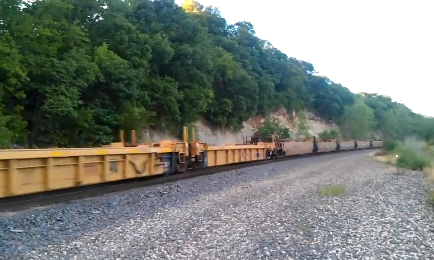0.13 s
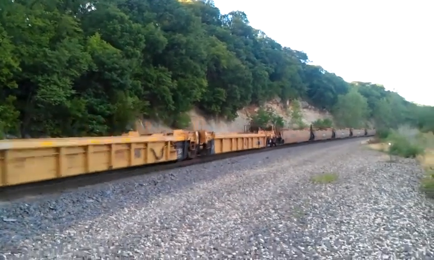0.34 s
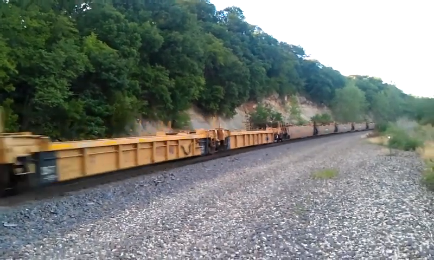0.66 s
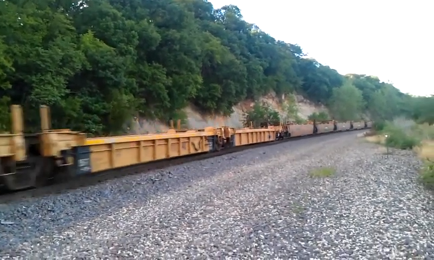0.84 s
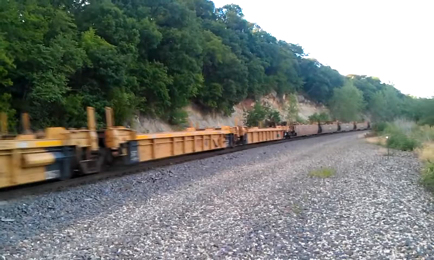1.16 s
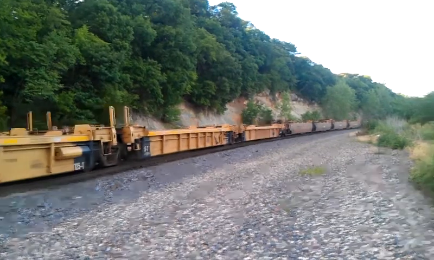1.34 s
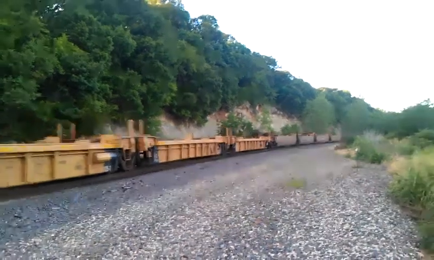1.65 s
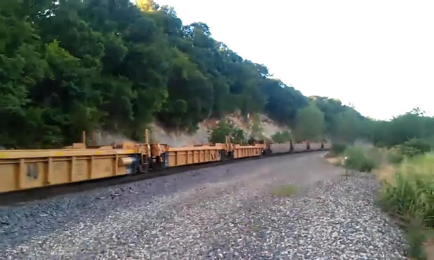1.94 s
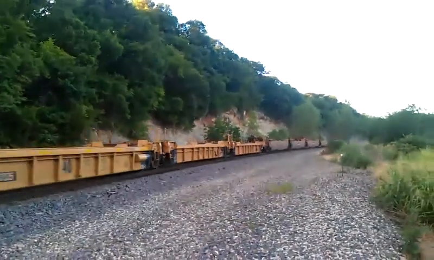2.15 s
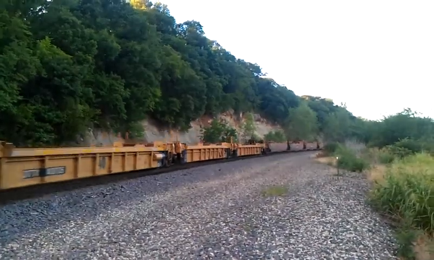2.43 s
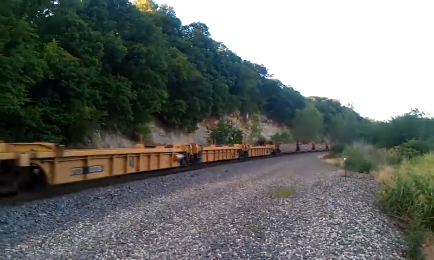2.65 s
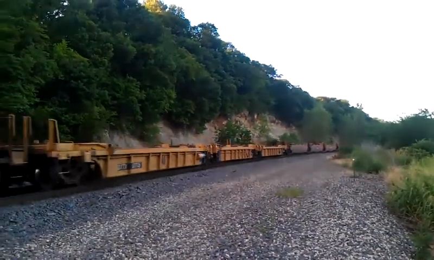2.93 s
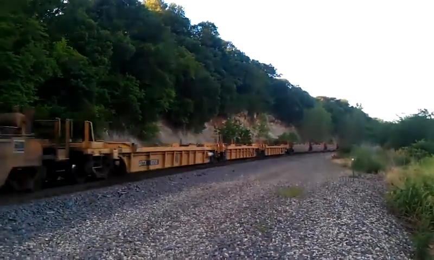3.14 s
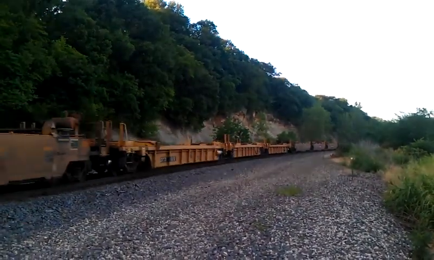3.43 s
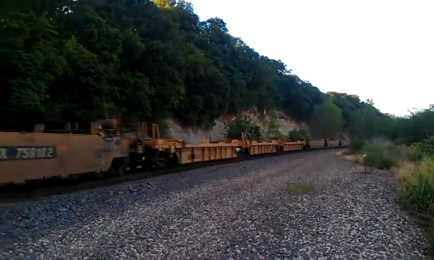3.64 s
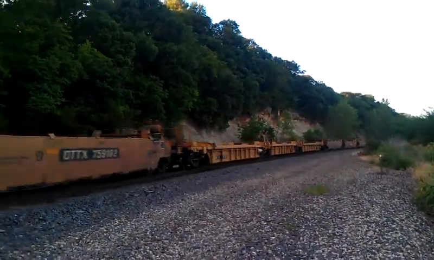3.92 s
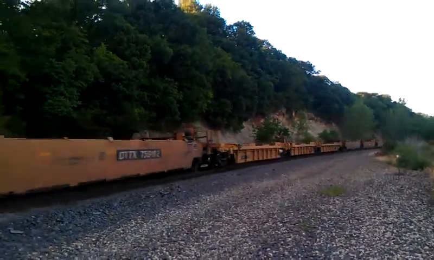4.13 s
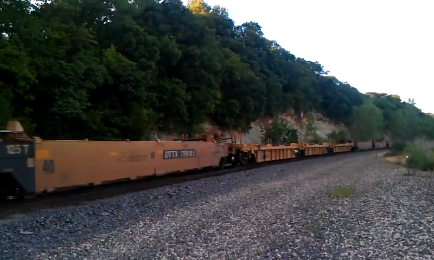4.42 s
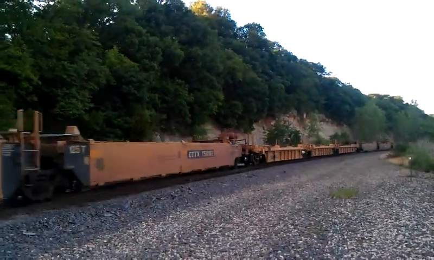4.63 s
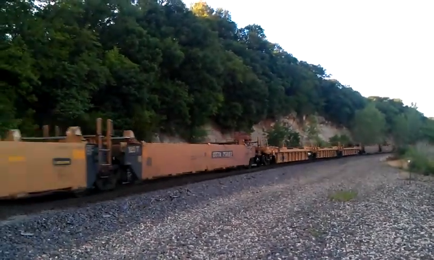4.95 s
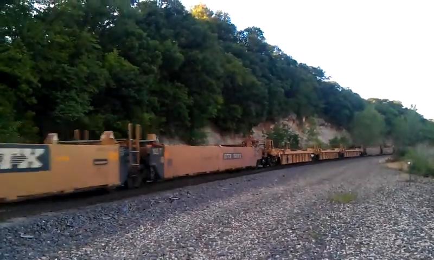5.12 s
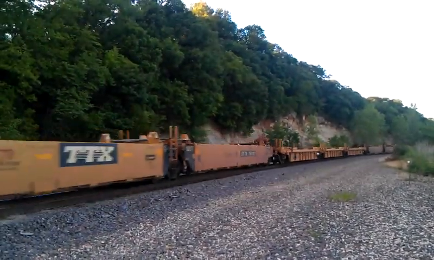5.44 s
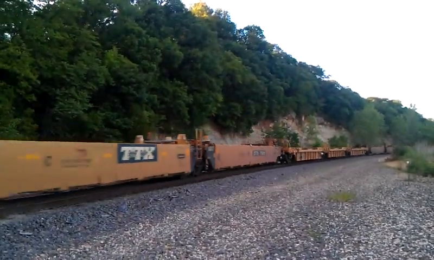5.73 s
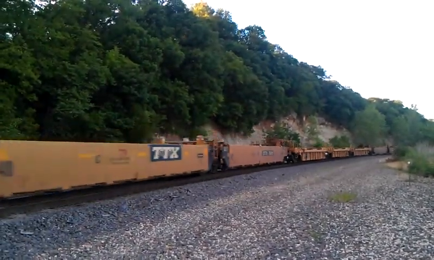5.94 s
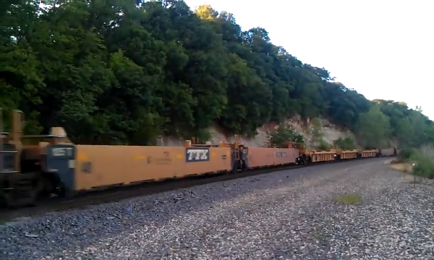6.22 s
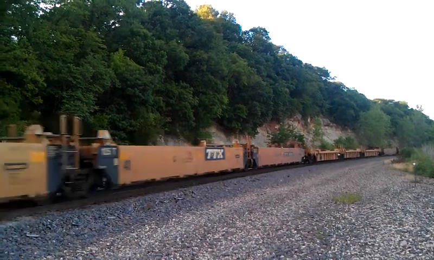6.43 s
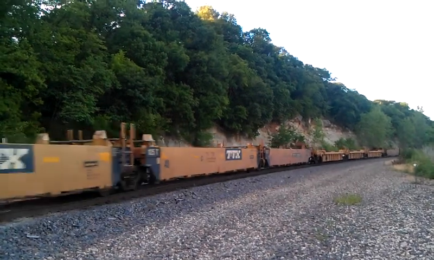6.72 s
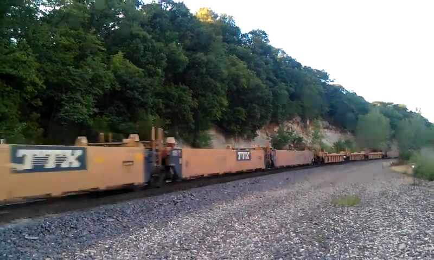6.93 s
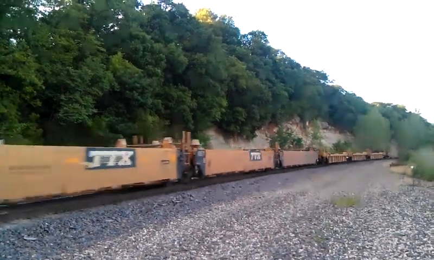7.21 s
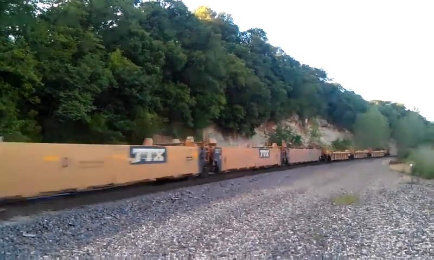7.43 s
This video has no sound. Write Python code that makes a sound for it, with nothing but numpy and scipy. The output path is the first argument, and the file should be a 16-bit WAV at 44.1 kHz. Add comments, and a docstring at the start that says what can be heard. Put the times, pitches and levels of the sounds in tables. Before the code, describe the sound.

Harsh grinding and piercing brake shrieks come from passing freight cars, with rumbling wheels and occasional clanking couplings underneath.

```python
"""On the ballast beside a curve, one small microphone, a freight train rolling past.
The empty cars rumble underneath, slack couplings knock, and a flat spot on one wheel thumps once a turn.
Steel grinds on steel, harder each time the brake shoes grab, and stick-slip sets the wheels ringing:
many modes squeal briefly, and over them come long shrieks near 6 and 10 kHz."""
import sys
import numpy as np
from scipy import signal
from scipy.fft import rfft, irfft, next_fast_len
from scipy.io import wavfile
from scipy.ndimage import uniform_filter1d, map_coordinates

SR = 44100
rng = np.random.default_rng(int(sys.argv[2]) if len(sys.argv) > 2 else 0)


def to_wav(sig):
    """Store sig (one row per channel, or 1-D mono) as 16-bit WAV at the path in sys.argv[1].

    Samples outside -1..1 are clipped; the rate is SR.
    """
    pcm = np.clip(np.atleast_2d(sig), -1, 1) * 32767
    pcm = np.round(pcm).astype(np.int16)
    wavfile.write(sys.argv[1], SR, pcm.T)  # frames by channels


N = 333837

# The cars going by. Each row: time in seconds, rumble in dB, roar in dB.
ROLLING_LEVELS = [(0.0, -41.5, -29.5), (0.4, -50, -39.5), (0.69, -44.5, -39.5), (0.9, -41, -39),
                  (1.43, -42.5, -37), (1.55, -38, -34), (1.8, -37, -31.5), (2.0, -41, -34.5),
                  (2.42, -47.5, -44), (2.72, -36.5, -34.5), (2.95, -40.5, -37.5), (3.12, -40, -41),
                  (3.44, -42, -43), (3.68, -42, -40), (3.82, -34.5, -36), (3.92, -39.5, -35.5),
                  (4.2, -37, -35), (4.64, -48, -43.5), (5.33, -46.5, -47), (5.44, -35.5, -36.5),
                  (5.9, -34, -32), (6.15, -38.5, -37), (6.39, -45, -40), (7.0, -48, -41.5),
                  (7.57, -42.5, -33)]
# Tone of the rumble, the roar and the car frames. Each row: frequency in Hz, relative level in dB.
RUMBLE_SPECTRUM = [(15, -66), (25, -41), (54, -23), (90, -11), (152, -0.5), (276, -1.5), (305, -1),
                   (342, -5), (458, -8.5), (520, -1.5), (680, -43), (1140, -120)]
ROAR_SPECTRUM = [(210, -33), (360, -7), (517, -10.5), (568, -3), (1050, -3), (1290, -4), (1480, -4.5),
                 (1700, -2), (2080, -9), (3520, -120)]
FRAME_SPECTRUM = [(250, -54), (450, -2), (800, -6.5), (1300, -0.5), (2200, -32)]
# Blows of the wheel flat and of the couplings. Each row: start in seconds, strength in dB.
FLAT_STRIKES = [(2.828, -25), (3.14, -33), (3.462, -27), (3.78, -25), (3.8, -25.5), (4.104, -25),
                (4.439, -36)]
COUPLING_BLOWS = [(0.049, -18), (0.139, -18), (0.279, -19), (0.953, -38), (1.569, -21), (2.189, -24),
                  (2.23, -19), (2.329, -24)]
# Steady rubbing in four ranges. Each row: time in seconds, then grind, rasp, hiss and sizzle in dB.
RUBBING_LEVELS = [(0.0, -23, -31.5, -23, -28.5), (0.4, -26, -29, -23.5, -33),
                  (0.73, -26, -31.5, -24.5, -35), (1.47, -29.5, -37.5, -27, -35.5),
                  (2.16, -28.5, -33, -23, -34), (2.48, -30, -34, -28, -33),
                  (2.98, -27.5, -27.5, -24.5, -30.5), (3.37, -30, -31, -28.5, -36),
                  (3.72, -28, -31.5, -30.5, -40), (3.9, -25.5, -29.5, -28.5, -36),
                  (4.08, -24, -31, -25.5, -30.5), (4.5, -24.5, -27, -22.5, -31),
                  (4.75, -25.5, -29, -23.5, -34), (5.0, -27, -31.5, -26, -33), (5.35, -31.5, -38, -30, -38),
                  (5.42, -30, -37, -32.5, -38), (5.47, -25.5, -32, -30.5, -34), (5.8, -25, -29, -28, -28.5),
                  (6.02, -25, -21.5, -19, -22.5), (6.47, -26.5, -22.5, -20.5, -24.5),
                  (6.95, -21.5, -23.5, -21.5, -26.5), (7.57, -22.5, -23, -20, -25.5)]
# Brake shoes grab, about once a wheel turn. Each row: time of full grip, rise, hold and release in
# seconds, then gain in dB of grind, rasp, hiss, sizzle and the shaking of the cars.
BRAKE_GRABS = [(0.062, 0.034, 0.069, 0.028, 4, 1, 1.5, 1, 3), (0.21, 0.067, 0.14, .06, 4.5, 1, 0, 2, 1.5),
               (0.438, 0.031, 0.026, 0.028, 6.5, 0, 0, 0, 1),
               (0.553, 0.061, 0.09, .05, 5.5, 4.5, 2, -1, -1),
               (0.766, 0.024, 0.17, 0.24, 7.5, 8, 6.5, 5, 0), (1.156, 0.11, 0.1, 0.21, 9, 8.5, 7, 5, -0.5),
               (1.531, 0.036, 0.087, 0.089, 8.5, 7, 5, 7, 4), (1.594, 0.047, 0.01, 0.067, 3, 7, 3.5, 3, -2),
               (1.734, 0.059, 0.022, 0.089, 5.5, 6.5, 4, 4, 2),
               (1.861, 0.092, 0.033, 0.27, 11.5, 11, 6, 5, -1), (2.19, .016, 0.12, 0.13, 13, 9, 6.5, 9, 10),
               (2.23, .03, .006, .015, 2.5, 1.5, -3, 3, 2), (2.724, 0.15, 0.019, 0.075, 7, 2.5, 7, 0, 2),
               (2.841, 0.084, 0.084, 0.055, 7.5, 5, 4.5, -1, 2),
               (3.109, 0.15, 0.032, 0.23, 7.5, 6.5, 6.5, 3.5, 5.5),
               (3.5, 0.11, 0.089, 0.1, 2, 5.5, 3, 1, 1), (4.124, 0.031, 0.062, 0.29, 5.5, 9, 8.5, 5, 0.5),
               (5.26, 0.24, 0.038, 0.059, 7.5, 5.5, 5, 1, 3),
               (5.627, 0.046, .04, .1, -2.5, -1, 2, 6.5, -0.5), (6.06, .04, .03, 0.12, 0.5, 2, 1.5, 3, 2),
               (6.22, .03, 0.075, .15, 3, 0.5, 3, 1.5, 1.5), (7.037, .03, 0.018, 0.049, 0, 2, -0.5, 2, 0)]
# Tone of the four ranges. Each row: frequency in Hz, relative level in dB.
GRIND_SPECTRUM = [(1000, -36), (1400, -12.5), (1900, -5.5), (2500, 1.5), (3000, 0), (3400, -5.5),
                  (3900, -21)]
RASP_SPECTRUM = [(3100, -37), (3600, -2.5), (4400, -1), (5200, 0), (5800, 1), (6600, -22)]
HISS_SPECTRUM = [(5000, -51), (5800, -10.5), (6600, -4.5), (7200, -7.5), (8200, -1), (9500, 1),
                 (10500, -2.5), (11300, -56), (12500, -40)]
SIZZLE_SPECTRUM = [(9500, -44), (10800, 4.5), (11500, -1), (12400, -2), (13300, -7), (14100, -7),
                   (14800, -21), (15600, -14.5)]
# Resonances of all wheels, of the first to pass and of the later ones, then the quiet gaps between.
# Each row: frequency in Hz, width in Hz, height or depth in dB against the rubbing noise.
WHEEL_MODES = [(1770, 90, 0), (2400, 60, 0), (3200, 80, 0), (4070, 130, 2), (4400, 150, 0), (5000, 200, 3),
               (5850, 200, 2), (6680, 130, 0), (7480, 160, 0), (8080, 60, 0), (8290, 120, 2), (8500, 80, 0),
               (9330, 200, 0), (9850, 120, 0), (10230, 100, -2), (12200, 40, 0), (12600, 80, 0),
               (1919, 14, 4), (2073, 14, 3), (4874, 14, 3), (7080, 14, 4), (8060, 12, 6), (8477, 16, 4),
               (9344, 16, 3), (9828, 18, 3)]
FIRST_WHEEL_MODES = [(2551, 40, 4), (2784, 16, 4), (2860, 110, 3), (3540, 14, 5), (3592, 20, 5),
                     (3640, 40, 0)]
LATER_WHEEL_MODES = [(2160, 40, 2), (2650, 50, 4), (3770, 20, 3), (4115, 30, 4)]
WHEEL_GAPS = [(1290, 120, -6), (3424, 104, -5), (3800, 99, -0.5), (4630, 110, -5), (5450, 110, -1),
              (6500, 180, -0.5), (7140, 180, -1.5), (11400, 250, -3), (13400, 500, -4)]
# The clearest single modes. Each row: start and end in seconds, pitch and width in Hz, level in dB.
CLEAR_SQUEALS = [(0.0, 0.16, 8775, 47, -32), (0.0, 0.25, 9465, 32, -26), (0.0, 0.3, 2410, 8, -27),
                 (0.0, 0.46, 9970, 54, -29), (0.0, 0.49, 12550, 58, -38), (0.0, 0.68, 2552, 9, -26),
                 (0.74, 1.36, 2549, 9, -26), (0.14, 0.24, 2930, 30, -24), (0.24, 0.4, 2900, 45, -31),
                 (0.2, 0.34, 1770, 45, -35), (0.92, 1.2, 1770, 30, -37), (0.65, 0.88, 1420, 25, -41),
                 (0.77, 0.84, 2200, 40, -31), (1.38, 1.5, 530, 30, -44), (0.5, 0.69, 4315, 35, -36),
                 (0.43, 0.66, 5080, 31, -29), (0.43, 1.24, 2865, 30, -29), (0.53, 0.73, 10000, 8, -33),
                 (0.53, 1.19, 12380, 25, -42), (0.65, 1.76, 12200, 8, -39), (0.73, 1.0, 3590, 18, -31),
                 (0.03, 0.36, 3630, 25, -38), (0.99, 1.6, 9830, 35, -29), (1.07, 1.31, 4425, 31, -33),
                 (1.14, 1.38, 2370, 8, -32), (1.27, 1.78, 8325, 47, -30), (1.36, 1.86, 8065, 12, -34),
                 (1.5, 1.96, 2850, 55, -28), (1.5, 1.95, 2550, 14, -33), (1.52, 1.7, 3540, 31, -31),
                 (1.78, 2.01, 3585, 12, -34), (1.66, 1.78, 9250, 8, -31), (1.84, 2.05, 8560, 8, -29),
                 (2.02, 2.15, 9315, 8, -31), (2.13, 2.43, 3630, 27, -33), (2.15, 2.24, 1730, 30, -30),
                 (2.16, 2.37, 9800, 17, -28), (2.165, 2.26, 2810, 30, -20), (2.26, 2.42, 2780, 35, -25),
                 (2.2, 2.36, 1920, 20, -30), (2.2, 2.48, 6485, 56, -31), (2.25, 2.56, 9455, 29, -28),
                 (2.37, 3.16, 8065, 16, -28), (2.39, 3.07, 8260, 51, -29), (2.58, 2.74, 2860, 30, -30),
                 (2.84, 2.96, 2860, 35, -27), (3.02, 3.35, 2850, 35, -29), (3.44, 3.75, 2850, 28, -33),
                 (2.47, 2.78, 2540, 30, -33), (2.6, 2.85, 2260, 18, -37), (3.02, 3.2, 2130, 25, -36),
                 (2.24, 2.45, 11150, 40, -38), (2.24, 2.45, 11500, 30, -40), (2.75, 3.1, 11950, 20, -44),
                 (2.7, 3.3, 12300, 20, -45), (3.85, 4.15, 6820, 25, -40), (4.02, 4.13, 520, 30, -39),
                 (2.53, 3.35, 14695, 9, -44), (2.55, 2.95, 9830, 8, -29), (2.78, 2.92, 3175, 8, -30),
                 (2.84, 3.09, 2555, 25, -29), (3.32, 3.79, 7440, 52, -35), (3.35, 3.65, 9785, 17, -31),
                 (3.41, 4.06, 8245, 38, -37), (3.43, 4.08, 8070, 15, -37), (3.76, 4.19, 12595, 8, -38),
                 (3.79, 4.21, 2855, 18, -33), (3.85, 4.17, 12330, 8, -40), (3.88, 4.36, 14695, 11, -45),
                 (4.05, 4.26, 5095, 50, -33), (4.08, 4.46, 8475, 57, -26), (4.12, 4.48, 9345, 8, -29),
                 (4.63, 5.0, 8475, 27, -33), (4.89, 5.52, 9275, 25, -37), (5.09, 5.26, 3260, 20, -38),
                 (5.25, 5.6, 3145, 12, -35), (5.2, 5.75, 4829, 8, -40), (5.45, 5.63, 4930, 45, -36),
                 (5.45, 5.8, 2940, 30, -35), (5.7, 5.8, 4090, 20, -35), (5.43, 5.7, 11055, 8, -39),
                 (5.47, 5.97, 8235, 15, -37), (5.47, 5.98, 8085, 12, -38), (5.54, 5.91, 12200, 8, -37),
                 (5.55, 5.76, 14375, 58, -41), (5.57, 5.84, 10865, 19, -36), (5.62, 5.8, 10390, 19, -35),
                 (5.63, 5.78, 10230, 34, -34), (5.67, 6.3, 4005, 30, -38), (5.85, 6.32, 4100, 30, -38),
                 (6.3, 7.45, 1605, 35, -41), (6.7, 7.5, 4950, 80, -35), (5.98, 6.1, 8325, 25, -29),
                 (6.0, 6.07, 4070, 50, -24), (6.03, 6.27, 10625, 18, -30), (6.07, 6.21, 9140, 15, -28),
                 (6.21, 6.29, 4030, 40, -25), (6.24, 6.49, 8385, 8, -29), (6.36, 6.71, 5060, 50, -33),
                 (6.85, 7.49, 3215, 18, -34), (6.93, 7.48, 2650, 10, -31), (7.06, 7.27, 5050, 29, -34),
                 (7.2, 7.33, 2380, 12, -32), (7.47, 7.56, 2350, 15, -32), (7.5, 7.56, 2150, 15, -34),
                 (6.04, 6.2, 10290, 50, -25)]
# Four shrieks, three near 6 kHz and one near 10 kHz, a list each. Each row: time in seconds, level in dB.
SHRIEK_LEVELS = [
    [(3.0, -38), (3.1, -20), (3.22, -20), (3.26, -25), (3.34, -22), (3.37, -27), (3.41, -21.5), (3.47, -23),
     (3.5, -25), (3.55, -23), (3.69, -24.5), (3.73, -23), (3.79, -41), (3.86, -28)],
    [(4.1, -42), (4.15, -23), (4.18, -22), (4.205, -18), (4.37, -17.5), (4.445, -16), (4.5, -17.5),
     (4.9, -16.5), (4.94, -19), (4.99, -23), (5.04, -17.5), (5.1, -26), (5.135, -13), (5.175, -22),
     (5.29, -21.5), (5.43, -32), (5.47, -30), (5.6, -41), (5.75, -30)],
    [(5.92, -36), (6.0, -24), (6.08, -28), (6.3, -24.5), (6.65, -27), (7.2, -31), (7.57, -31)],
    [(5.95, -37), (6.06, -21.5), (6.35, -17.5), (6.38, -21.5), (6.72, -20.5), (7.0, -19.5), (7.57, -21.5)],
]
# Their modes, a list for each shriek. Each row: pitch in Hz, width in Hz, relative level in dB.
SHRIEK_MODES = [
    [(5800, 35, -2), (5860, 20, -3), (5952, 12, -1), (5870, 110, -1)],
    [(5790, 40, -8), (5860, 18, -4), (5925, 12, 0), (6015, 40, -9), (5890, 110, -3)],
    [(5715, 50, -3), (5820, 90, 0), (5920, 60, -4)],
    [(9990, 35, -1), (10042, 7, 0), (10170, 40, -5), (10240, 9, -4), (10100, 170, -3)],
]
# Each shriek's fall in pitch in Hz: positive as a wheel rolls away, negative as one nears.
SHRIEK_FALL_HZ = [15, 220, -40, 15]


def amp(db):
    """Gain of a level in dB."""
    return 10 ** (np.asarray(db) / 20)


def unit(x):
    """x at rms 1."""
    return x / np.sqrt(np.mean(np.abs(x) ** 2) + 1e-20)


def spectrum_gain(spectrum, hz):
    """Gain at hz of a spectrum, its points joined on a log frequency axis."""
    points_hz, db = np.transpose(spectrum)
    return amp(np.interp(np.log(hz + 1), np.log(points_hz + 1), db))


def curves(rows, t):
    """Each column after the time, read at the times t."""
    times, *columns = np.transpose(rows)
    return [np.interp(t, times, column) for column in columns]


def wobble(rate, size=N):
    """A smooth random curve, rate knots a second."""
    knots = rng.standard_normal(int(size * rate / SR) + 4)
    return map_coordinates(knots, [np.arange(size) * rate / SR])


def fade(size, rise_s, fall_s):
    """Soft start and end."""
    t = np.arange(size) / SR
    return np.minimum(1, t / rise_s) * np.minimum(1, t[::-1] / fall_s)


def filtered(x, response):
    """x through a gain that depends on frequency."""
    padded = next_fast_len(N + 8192)
    return irfft(rfft(x, padded) * response(np.fft.rfftfreq(padded, 1 / SR)), padded)[..., :N]


def rush(spectrum, patchy_db, streaky_db):
    """Coloured noise at rms 1, with broad random patches and thin streaks where minor modes ring."""
    bins = signal.stft(rng.standard_normal(N), nperseg=1024)[2]
    chance = rng.standard_normal((2, *bins.shape))
    patches = uniform_filter1d(uniform_filter1d(chance[0], size=10, axis=0), size=6, axis=1)
    streaks = uniform_filter1d(chance[1], size=14, axis=1)
    gain = amp(patchy_db * unit(patches) + streaky_db * unit(streaks))
    noise = signal.istft(bins * gain, nperseg=1024)[1][:N]
    return unit(filtered(noise, lambda hz: spectrum_gain(spectrum, hz)))


def rolling_cars(shake_db):
    """Wheels on rail joints and corrugation shake the empty car bodies, more so when a brake grabs."""
    rumble_db, roar_db = curves(ROLLING_LEVELS, np.arange(N) / SR)
    jolts_db = .5 * wobble(7)
    rumble = amp(rumble_db + .64 * shake_db + jolts_db) * rush(RUMBLE_SPECTRUM, .6, 1.1)
    roar = amp(roar_db + shake_db + .62 * jolts_db) * rush(ROAR_SPECTRUM, 1.35, 1.5)
    return rumble + roar


def wheel_flat():
    """The flat spot lands with a soft low blow: a few cycles of rail and sleeper."""
    out, t = np.zeros(N), np.arange(SR // 8) / SR
    push = (t / .014) * np.exp(1 - t / .014)
    for start, db in FLAT_STRIKES:
        phase = rng.uniform(0, 2 * np.pi)
        ring = np.sin(2 * np.pi * 155 * t) + .66 * np.sin(2 * np.pi * 235 * t + phase)
        out[round(start * SR):][:len(t)] += amp(db) * push ** 2 * unit(ring) / np.sqrt(2)
    return out


def coupling_knocks():
    """Slack couplings knock: short bursts of noise in the car frames."""
    blows, t = np.zeros(N), np.arange(SR // 16) / SR
    burst = (t / .0068) * np.exp(1 - t / .0065)
    for start, db in COUPLING_BLOWS:
        blows[round(start * SR):][:len(t)] += amp(db) * burst * rng.standard_normal(len(t))
    return amp(6.5) * filtered(blows, lambda hz: spectrum_gain(FRAME_SPECTRUM, hz))


def brake_grabs(t):
    """Each grab rises, holds and lets go: gains in dB of the four ranges and of the shaking."""
    gripped, rise, hold, release, *gains = np.transpose(BRAKE_GRABS)[:, :, None]
    closing = 1 + (t - gripped) / rise
    opening = 1 - (t - gripped - hold) / release
    grip = np.clip(np.minimum(closing, opening), 0, 1)
    return np.array([np.sum(gain_db * grip, axis=0) for gain_db in gains])


def contact_pressure():
    """Steady rubbing with the grabs on top: levels in dB of the four ranges, then of the shaking."""
    t = np.arange(0, N / SR + .01, .002)
    levels = np.array(curves(RUBBING_LEVELS, t) + [np.zeros_like(t)]) + brake_grabs(t)
    return curves(np.c_[t, levels.T], np.arange(N) / SR)


def wheel_response(hz, own_modes):
    """Gain of a wheel's resonances and gaps over a flat base."""
    bell = lambda centre, width: 1 / (1 + (2 * (hz - centre) / width) ** 2) ** 2
    peak_power = sum(amp(db) ** 2 * bell(centre, width) for centre, width, db in WHEEL_MODES + own_modes)
    gaps_db = sum(db * bell(centre, width) for centre, width, db in WHEEL_GAPS)
    return np.sqrt(1 + peak_power) * amp(gaps_db)


def rubbing(ranges_db):
    """Four ranges of friction noise, shaken partly together by uneven contact, ring through the wheels."""
    chatter_db = .5 * wobble(14) + .37 * wobble(45)
    spectra = GRIND_SPECTRUM, RASP_SPECTRUM, HISS_SPECTRUM, SIZZLE_SPECTRUM
    trims_db, wavers_db = (-3, -2.5, -.5, -2.2), (1.1, 1, .44, .38)
    friction = np.zeros(N)
    for db, spectrum, trim_db, waver_db in zip(ranges_db, spectra, trims_db, wavers_db):
        gain = amp(db + trim_db + chatter_db + waver_db * wobble(18))
        friction += gain * rush(spectrum, patchy_db=.52, streaky_db=3.5)
    takeover = np.interp(np.arange(N) / SR, (5.6, 6.1), (0, 1))  # later wheels reach the microphone
    first = filtered((1 - takeover) * friction, lambda hz: wheel_response(hz, FIRST_WHEEL_MODES))
    later = filtered(takeover * friction, lambda hz: wheel_response(hz, LATER_WHEEL_MODES))
    return first + later


def singing_mode(hz, width_hz, size, steadiness):
    """Stick-slip drives a tone whose level and phase wander, slowly in its core and fast in its skirt."""
    force = rng.standard_normal(size) + 1j * rng.standard_normal(size)
    pole = np.exp(-2 * np.pi * np.clip(width_hz, 2, 500) / SR)
    skirt = signal.lfilter([1 - pole], [1, -pole], force)
    core = unit(signal.lfilter([1 - pole], [1, -pole], skirt))
    wander = core * np.abs(core) ** -steadiness + .15 * unit(skirt)  # steadiness 1 holds the core level
    carrier = np.exp(2j * np.pi * np.cumsum(hz * np.ones(size)) / SR)
    return unit((wander * carrier).real)


def squeals(ranges_db, faint_count=32, faint_s=.2, detune=.01):
    """Single modes swell and sink with the rubbing pressure in their range; faint ones sing by chance."""
    pressure_db = lambda hz: ranges_db[np.searchsorted([3400, 5500, 10600], hz)]
    out, faint = np.zeros(N), []
    for when, length, pick, tuning in rng.random((faint_count, 4)):
        start = when * (N / SR - 2 * faint_s)
        end = start + faint_s * (.5 + length)
        hz = WHEEL_MODES[int(pick * len(WHEEL_MODES))][0] * (1 + detune * (2 * tuning - 1))
        faint.append((start, end, hz, 22, pressure_db(hz)[round(start * SR)] - 18))
    for start, end, hz, width_hz, db in CLEAR_SQUEALS + faint:
        span = slice(round(start * SR), round(end * SR))
        size = span.stop - span.start
        swell = amp(.7 * pressure_db(hz)[span] + 2.2 * wobble(14, size)) * fade(size, .03, .04)
        out[span] += amp(db) * unit(swell * singing_mode(hz, width_hz, size, steadiness=.25))
    return out


def shrieks(stutter_db=2.5, flutter_db=.6):
    """Each shrieking wheel sounds a cluster of close modes that beat roughly and flutter."""
    out = np.zeros(N + SR)
    for levels, modes, fall_hz in zip(SHRIEK_LEVELS, SHRIEK_MODES, SHRIEK_FALL_HZ):
        t = np.arange(levels[0][0], levels[-1][0], 1 / SR)
        size = len(t)
        sag_hz = fall_hz * np.linspace(0, 1, size) ** 2.5
        cluster = np.zeros(size)
        for hz, width_hz, db in modes:
            gain = amp(db + stutter_db * wobble(11, size))  # each mode comes and goes on its own
            cluster += gain * singing_mode(hz - sag_hz, width_hz, size, steadiness=.5)
        level_db = curves(levels, t)[0] + flutter_db * wobble(16, size)
        out[round(t[0] * SR):][:size] += amp(level_db) * unit(cluster) * fade(size, .021, .015)
    return out[:N]


def scene():
    """The whole train at one microphone on the ballast, the same in both channels."""
    *ranges_db, shake_db = contact_pressure()
    wheels = rubbing(ranges_db) + squeals(ranges_db) + shrieks()
    mono = wheels + rolling_cars(shake_db) + wheel_flat() + coupling_knocks()
    return np.array([mono, mono])


def record(dry):
    """The small microphone rounds the loudest peaks and loses the deep bass and the very top."""
    ceiling, low_cut_hz, top_hz = .72, 75, 15655
    rounded = dry / (1 + np.abs(dry / ceiling) ** 6) ** (1 / 6)
    return filtered(rounded, lambda hz: hz ** 2 / (hz ** 2 + low_cut_hz ** 2) * (hz < top_hz))


dry = scene()
out = record(dry)
to_wav(out)
```